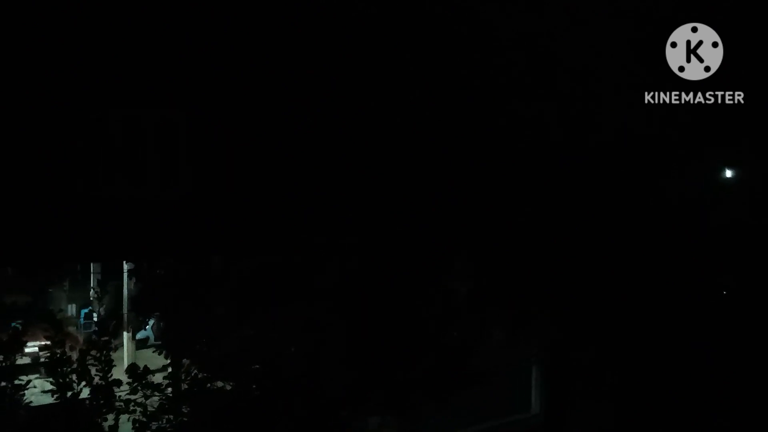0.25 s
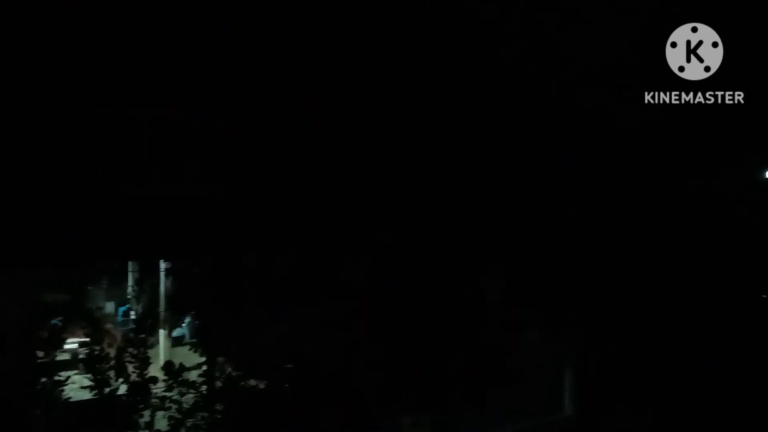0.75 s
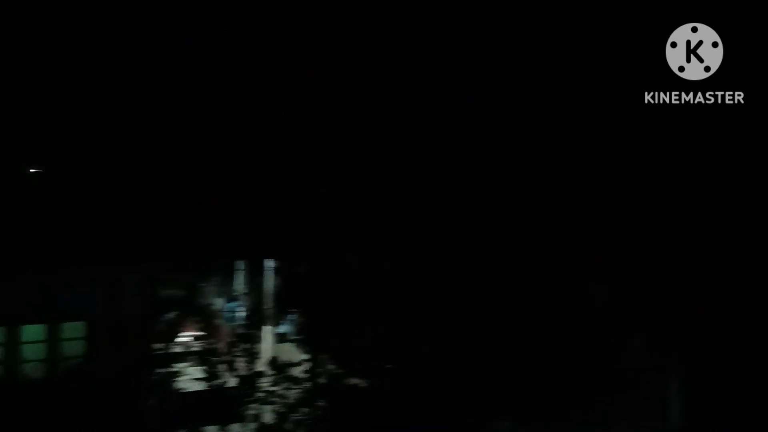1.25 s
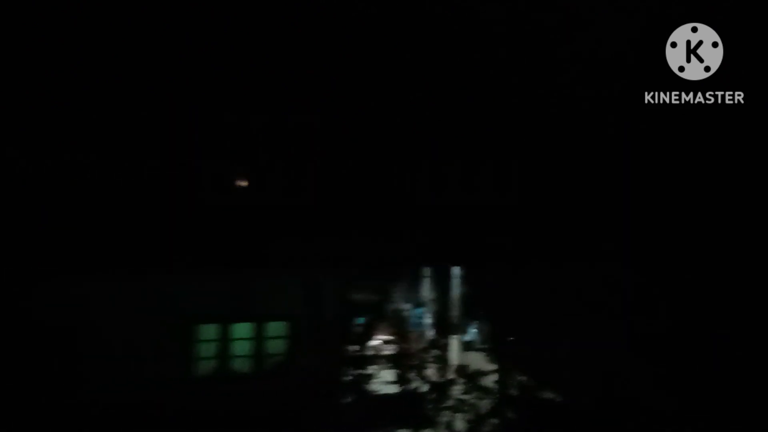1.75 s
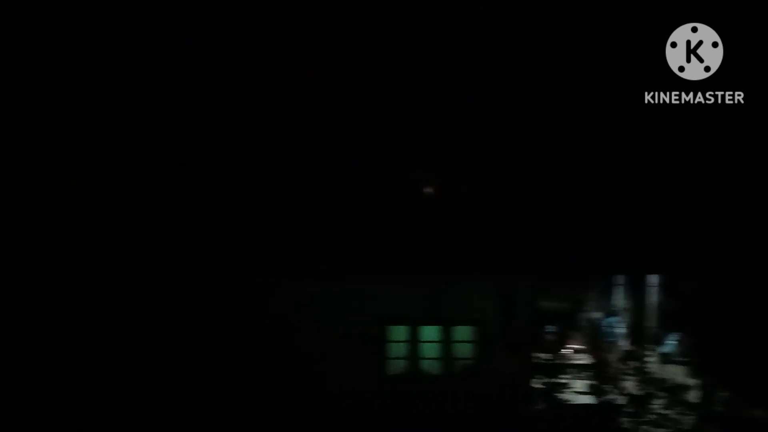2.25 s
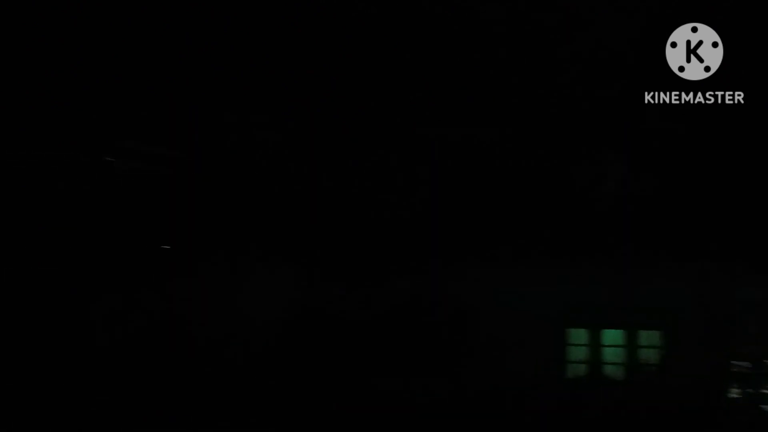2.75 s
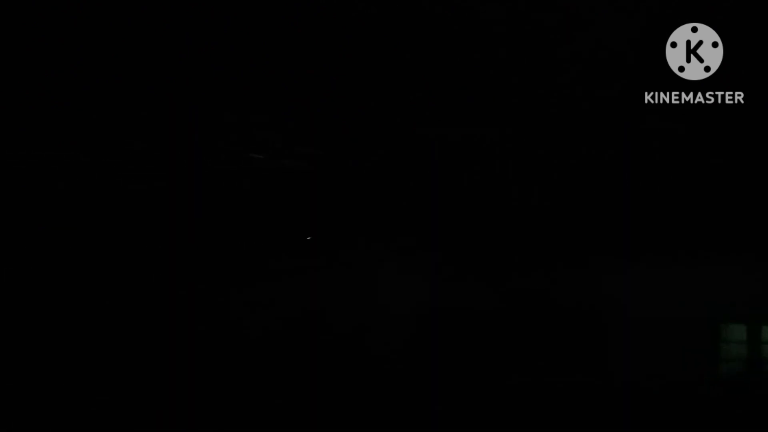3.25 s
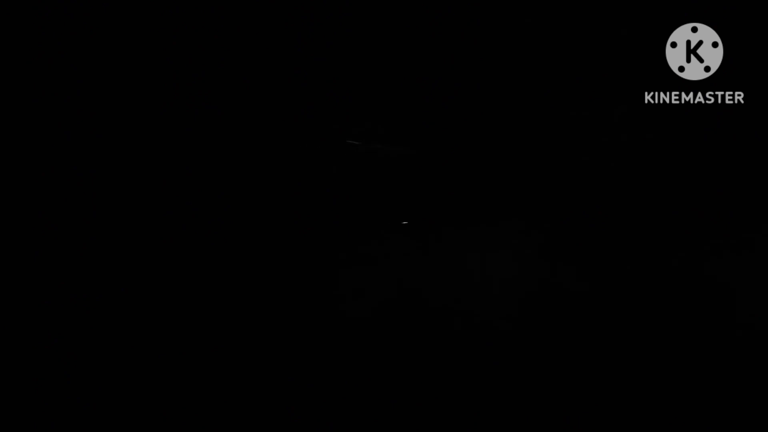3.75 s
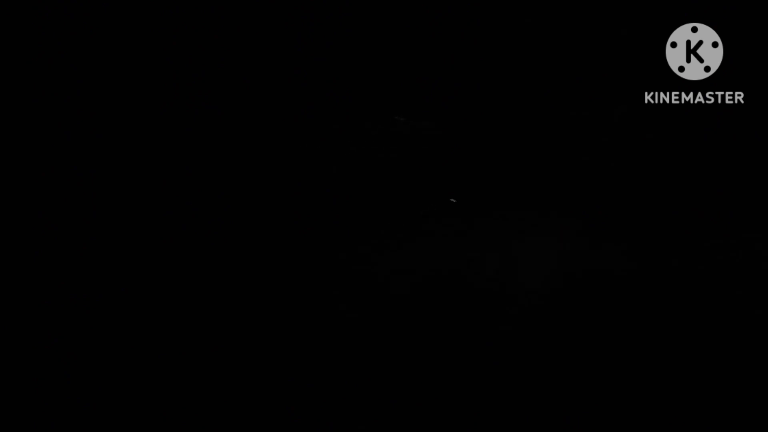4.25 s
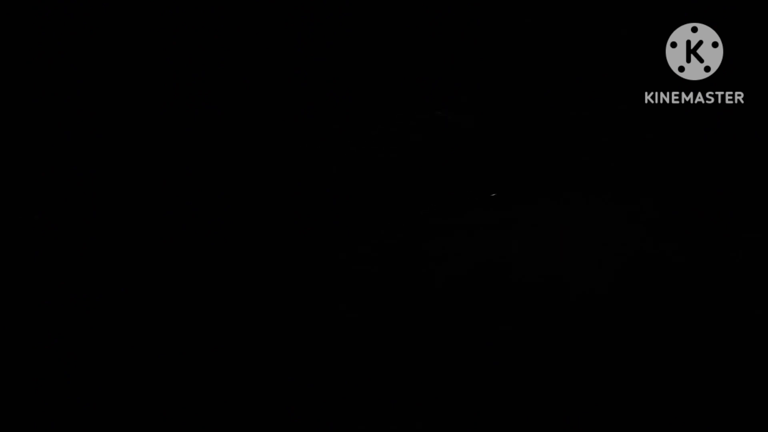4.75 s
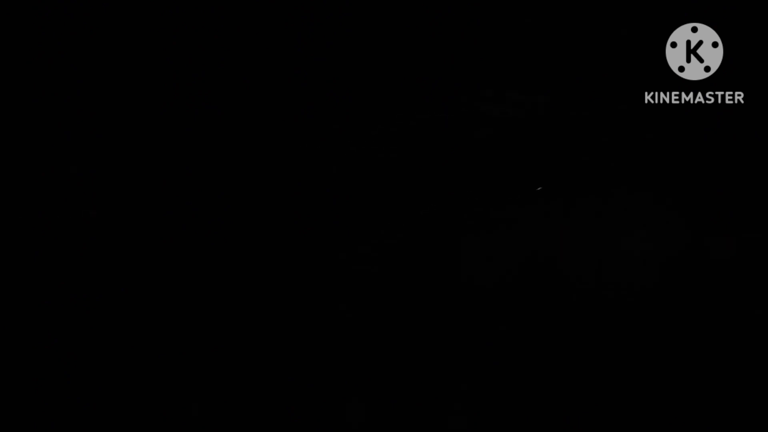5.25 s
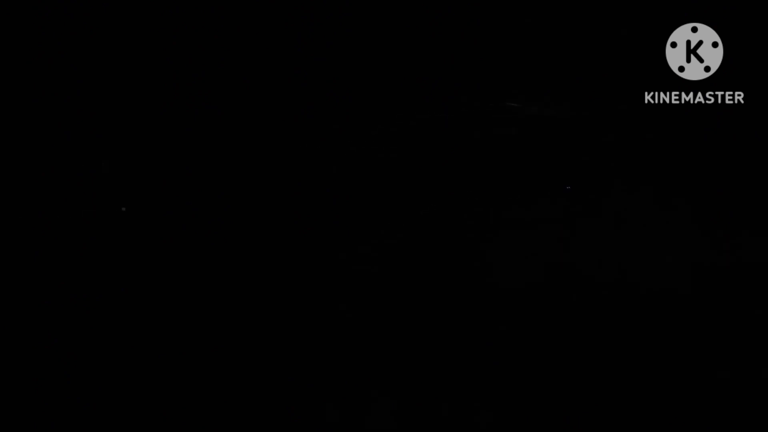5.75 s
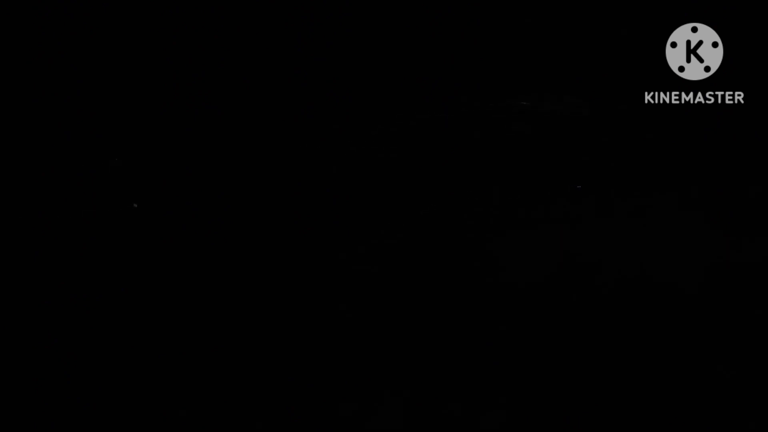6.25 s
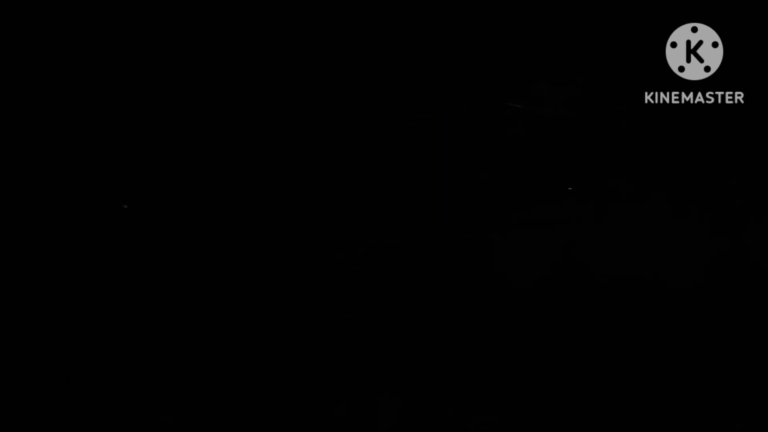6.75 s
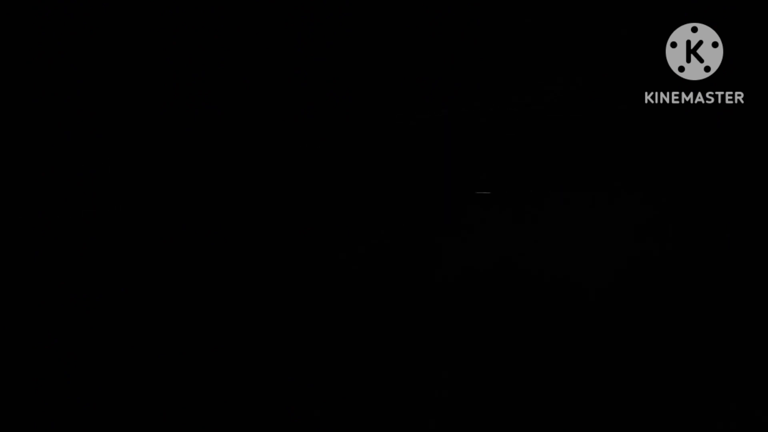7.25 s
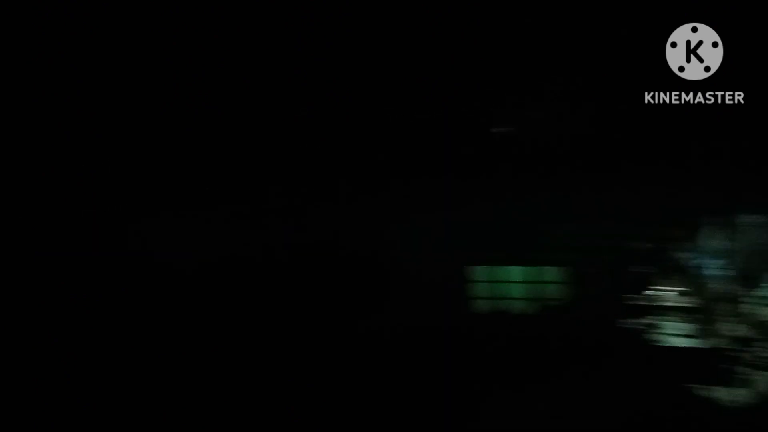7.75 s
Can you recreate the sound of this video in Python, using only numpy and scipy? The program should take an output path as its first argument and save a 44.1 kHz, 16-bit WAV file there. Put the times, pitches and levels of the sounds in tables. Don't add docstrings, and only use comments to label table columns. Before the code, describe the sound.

A nearby cricket gives short chirps over a faint far insect chorus at night, while loud finger taps knock the recorder's case.

```python
import sys
import numpy as np
from scipy import signal
from scipy.fft import rfft, irfft
from scipy.io import wavfile

SR = 44100
rng = np.random.default_rng(int(sys.argv[2]) if len(sys.argv) > 2 else 0)


def volts_from_decibels(level):
    exponent = np.asarray(level, float) / 20
    return 10 ** exponent


def int16_out(signal):
    q = np.round(np.clip(np.atleast_2d(signal).T, -1, 1) * 32767)
    wavfile.write(sys.argv[1], SR, q.astype(np.int16))


N = 352751

# t/s, peak level/dB, left-right
# level/dB, perhaps fade along the stroke [dB]
NEAR_STROKES = [(2.3216, -44.5, -8.0, -7.0), (2.3975, -43.5, -6.5, -7.0), (2.6963, -53.5, -0.5, -1.5),
                (2.7711, -44, -0.5, -6.0), (3.6548, -47, -6.5, -2.5), (3.7289, -48, -8),
                (4.2635, -48.5, -12), (5.325, -44.5, -9), (5.3994, -45, -10), (5.7753, -48, -9.5),
                (5.8486, -45, -11), (5.9272, -44, -10.5), (6.8483, -46.5, -9.5), (6.919, -45.5, -10.5),
                (6.9921, -43, -7.5)]
# centre after onset [ms], half length [ms], signed strength
STROKE_LOBES = [
    (3, 7.5, 1),
    (12.5, 4, -.55),
    (21.5, 8, -1),
]
STROKE_FROM_MS, STROKE_TO_MS = -7, 30
START_HZ, SAG_HZ_PER_MS, EASE_HZ_PER_MS2 = 3260, 20.5, .22

# first stroke t/s, last stroke t/s, peak level/dB, left-right level/dB
FAR_CHIRPS = [(.009, .080, -59, 2), (.331, .410, -61, 3), (.889, .889, -58, -2), (1.289, 1.439, -57, -2),
              (1.743, 1.888, -54, 0), (2.079, 2.140, -55, -2), (2.455, 2.579, -56, -2),
              (2.944, 3.087, -54, -2), (3.405, 3.543, -53.5, -2), (3.850, 4.129, -56, -1),
              (4.909, 5.112, -55, -3), (5.261, 5.261, -54, -7), (5.459, 5.459, -51, 0),
              (5.719, 5.719, -56, -8), (6.164, 6.164, -55.5, -4), (6.285, 6.490, -55, -2),
              (6.645, 6.789, -57, -2), (7.290, 7.362, -54, -3), (7.849, 7.922, -55.5, -5)]
STROKE_GAP_S = .07
SWELL_DB = 0.56
# t/s, level/dB
CROWD_LEVEL = [(0, -66.5), (1.23, -65), (1.74, -70), (2.38, -64.5), (3.43, -68.5), (3.61, -61.5),
               (3.92, -67), (4.28, -59.5), (4.72, -68.5), (5.26, -63), (7.35, -62.5), (8, -67)]
# t/s, level/dB
TRILLER_LEVEL = [(0, -69), (1.2, -68), (2.2, -71), (3.5, -67), (4.3, -68), (4.8, -70.5), (5.9, -70.5),
                 (7.35, -66.5), (8, -69.5)]
# f/Hz, width [Hz], level/dB
HIGH_INSECTS = [
    (8530, 700, -88),
    (11300, 920, -91.5),
    (13400, 750, -95),
]
BUSH_DB = -75
# from t/s, throbs a second [Hz]
HIGH_TEMPO = [(0, 7.71), (4.5, 8.1)]
# from t/s, throbs a second [Hz]
LOW_TEMPO = [(0, 8.47), (4, 8.8), (5.5, 8.14)]
HIGH_START, LOW_START = .45, .42

# t/s, click level/dB, left-right level/dB, knock level/dB (fleshy above 0), tick level/dB
TAPS = [(0.7524, -38.5, -1, 2, -24), (0.7824, -11.5, -5, -0.8, -20), (0.9641, -41, -2, 15, -20.0),
        (4.1319, -27.5, 2, 1, -28), (4.16, -4.5, -3, -2.5, -19.5), (4.1922, -8.5, -6.5, 8, -27),
        (4.266, -38, 0, 0, -21), (4.274, -39, -4, 4, -21.0), (4.2916, -28.5, -10, 3, -25.0),
        (4.3626, -9.5, -7.5, -12, -20.5), (4.3677, -24.5, -4, 5, -35), (4.3829, -28, -24, 5.5, -26),
        (4.6012, -14, -1, -3.5, -30), (4.6924, -50.5, -8, 11, -14.0), (4.7246, -46, 4, 6, -16.0),
        (7.5792, -26.5, -3, -4.5, -22), (7.663, -12, -6.5, -11, -12), (7.7015, -27, -5, -8.5, -38),
        (7.806, -39.5, -3, 0, -21.0)]
# f/Hz, width [Hz], level/dB
CASE_RINGS = [
    [(295, 340, 0.5), (640, 640, 10), (1080, 1600, -21)],
    [(1260, 1480, 6.5), (2025, 1050, 11.5), (3390, 1800, -13)],
    [(5200, 3400, 8.5), (7400, 2500, -15), (12000, 8100, -10)],
    [(138, 170, 0)],
]
TRAVEL_MS = 1.55, 0.39
THUMP_DB, THUMP_PER_KNOCK = -21, 0.87
# t/s, level/dB, time to fall 20 dB [s]
ROCKS = [(.969, -47, .015), (1.105, -61, .015), (1.554, -57, .025), (4.146, -30, .016), (4.168, -33, .013),
         (4.2, -34.5, .012), (4.298, -50, .018), (4.366, -46, .01), (4.418, -48, .014), (4.548, -55, .025),
         (4.608, -33, .017), (4.627, -46, .018), (4.7, -55, .015), (4.729, -49, .014), (4.996, -60, .04),
         (7.669, -49, .013), (7.706, -55, .012)]
RISE_SHARE = .45
LUMP_HZ, LUMP_SPREAD, LUMP_PAN_DB = 112, .1, 4.5
# start t/s, end t/s, start level/dB, end level/dB, left-right level/dB
RUBS = [(.964, 1.0, -50, -45.5, -12), (1.008, 1.07, -45, -47, -10), (1.078, 1.092, -49, -54, -9),
        (4.134, 4.139, -46, -53, -6), (4.203, 4.217, -41, -54.5, -8), (4.26, 4.321, -60, -61, -3),
        (4.372, 4.461, -46, -63, -4), (4.53, 4.597, -66, -53.5, -7), (4.606, 4.66, -46, -54, -6.5),
        (4.937, 5.05, -61, -67.5, 4), (7.805, 7.86, -57.5, -78, -5)]
# f/Hz, level/dB per Hz
RUB_SPECTRUM = [(120, -41), (200, -15), (312, -5), (815, -2), (1060, -6), (1320, 2), (2300, 3), (2900, -2),
                (4330, -23), (6750, -25.5), (14000, -45)]
EDGE_S = .008
# start t/s, end t/s, f/Hz, level/dB
CREAKS = [
    (4.381, 4.391, 563, -32.5),
    (4.602, 4.624, 102, -44),
    (4.626, 4.636, 486, -45),
    (4.629, 4.643, 640, -44),
    (4.721, 4.729, 640, -48.5),
]

# start t/s, end t/s, f/Hz, level/dB
HOOTS = [(0.102, 0.255, 650, -73), (0.36, 0.563, 649, -71), (.49, 0.674, 827, -68), (.44, .6, 1300, -74.5),
         (1.1, 1.26, 832, -72.5), (1.553, 1.697, 657, -68), (2.575, 2.8, 1980, -71),
         (3.78, 3.982, 1940, -74), (4.743, 5.1, 655, -68), (4.9, 5.02, 790, -68), (5.2, 5.496, 1166, -72.5)]
# f/Hz, level/dB per Hz
NIGHT_SPECTRUM = [(24, -19), (50, -22.5), (75, -13.5), (160, -14.5), (320, -16.5), (680, -9), (1100, -13.5),
                  (1650, -21.5), (2500, -16), (3500, -32), (4200, -30), (5500, -51.5), (8000, -38.5),
                  (15500, -43)]
# f/Hz, correlation [-1 to 1]
LIKENESS = [(60, 0.79), (180, 0.55), (550, 0.67), (1650, 0.047), (4970, -0.092), (15000, 0.17)]
# f/Hz, left-right level/dB
NIGHT_SIDES = [(60, 3), (240, -1), (950, 0.5), (3770, -0.5), (15000, 2)]
NIGHT_DB = -60.5
HUM_HZ, HUM_DB = 100.5, -66.5

TOP_HZ = 15500
OFFSET = .00105


def rms_one(x):
    return x / np.sqrt(np.mean(x ** 2) + 1e-20)


def in_time(rows):
    s, *columns = np.transpose(rows)
    return [np.interp(np.arange(N) / SR, s, column) for column in columns]


def at_hz(points, hz):
    points = np.array(points)
    return np.interp(np.log(hz), np.log(points[:, 0]), points[:, 1])


def sides(pan_db):
    return volts_from_decibels(np.array([pan_db / 2, -pan_db / 2]))


def drift(rate):
    r = np.exp(-80 * np.pi * rate / SR)
    slow = signal.lfilter([1], [1, -2 * r, r * r], rng.standard_normal(N // 40 + 2002))[2000:]
    return np.interp(np.arange(N) / 40, np.arange(len(slow)), rms_one(slow))


def resonance(x, hz, width_hz):
    r = np.exp(-np.pi * width_hz / SR)
    poles = [1, -2 * r * np.cos(2 * np.pi * hz / SR), r * r]
    return signal.lfilter(np.array([1, 0, -1]) * (1 - r * r) / 2, poles, x)


def narrow(hz, width_hz):
    once = resonance(rng.standard_normal((2, N)), hz, width_hz)
    return rms_one(resonance(once, hz, width_hz))


def add(out, s, sound):
    i = max(round(s * SR), 0)
    out[:, i:i + sound.shape[1]] += sound[:, :N - i]


def stroke(stretch, tune, phases, fade_db):
    t = np.arange(STROKE_FROM_MS, STROKE_TO_MS, 1000 / SR / stretch)
    shape = 0
    for ms, half, strength in STROKE_LOBES:
        shape = shape + strength * np.cos(np.pi / 2 * np.clip((t - ms) / half, -1, 1)) ** 1.5
    age = t - STROKE_FROM_MS
    hz = START_HZ - SAG_HZ_PER_MS * age + EASE_HZ_PER_MS2 * age ** 2
    turns = np.cumsum(tune * hz) / SR
    return shape * volts_from_decibels(fade_db * t / 20) * np.sin(2 * np.pi * turns + np.array(phases)[:, None])


def crickets(rows, trim_db, tune_spread, echo_db, scatter=3):
    out = np.zeros((2, N))
    for (s, db, pan_db, *fade_db), (a, b, c, d) in zip(rows, rng.standard_normal((len(rows), 4))):
        phases = (3 * c, 3 * c + 1.6 + scatter * d)
        both = stroke(1 + .03 * a, 1 + tune_spread * b, phases, sum(fade_db))
        add(out, s + STROKE_FROM_MS / 1000, volts_from_decibels(db + trim_db) * sides(pan_db)[:, None] * both)
    age = np.arange(6000) / SR
    sparse = rng.random((2, len(age))) < .01
    echoes = rng.standard_normal((2, len(age))) * sparse * volts_from_decibels(-60 * age / 0.67) * (age > .004)
    echoes /= np.sqrt(np.sum(echoes ** 2, axis=1, keepdims=True))
    return out + volts_from_decibels(echo_db) * signal.fftconvolve(out, echoes, axes=1)[:, :N]


def near_crickets():
    return crickets(NEAR_STROKES, 0.57, tune_spread=0.0063, echo_db=-13, scatter=0.099)


def taps():
    out, hz = np.zeros((2, N)), np.fft.rfftfreq(4096, 1 / SR) + 1
    impulse = np.zeros(4096)
    impulse[0] = 1
    rings = []
    for i, part in enumerate(CASE_RINGS):
        ring = 0
        for k, (f, width, db) in enumerate(part):
            mode = resonance(resonance(impulse, f, 0.91 * width), f, 1.51 * width)
            ring = ring + (-1) ** (i + k) * volts_from_decibels(db) * mode
        rings.append(ring)
    for (s, db, pan_db, knock_db, tick_db), chance in zip(TAPS, rng.random((len(TAPS), 2, 2))):
        tilt_db = np.clip(1 - knock_db, 0, 7)
        thump_db = THUMP_DB + THUMP_PER_KNOCK * knock_db
        levels = [(knock_db, pan_db + tilt_db), (0, pan_db - 2), (tick_db, pan_db - 2), (thump_db, pan_db + 7)]
        both = np.zeros((2, 3000))
        for port, (ms, (a, b)) in enumerate(zip(TRAVEL_MS, chance)):
            turns = ms * (.8 + .4 * a) * (2 * np.sqrt(hz / 1000) - hz / 4000)
            back = 1 - 0.27 * np.exp(-2j * np.pi * (hz * (0.000935 + 0.00069 * b) + 0.494 * turns))
            for ring, (level_db, side_db) in zip(rings, levels):
                wave = irfft(rfft(ring) * np.exp(-2j * np.pi * turns) * back)[:3000]
                share = sides(side_db) / np.linalg.norm(sides(side_db))
                both[port] += volts_from_decibels(db + level_db) * share[port] * wave / abs(signal.hilbert(wave)).max()
        add(out, s - .0004, both)
    return out


def rocking():
    out, t = np.zeros((2, N)), np.arange(-.05, .2, 1 / SR)
    for (s, db, fall_s), (a, b, c) in zip(ROCKS, rng.standard_normal((len(ROCKS), 3))):
        swell = volts_from_decibels(db + 3 - 20 * np.maximum(t, -t / RISE_SHARE) / fall_s)
        turns = LUMP_HZ * (1 + LUMP_SPREAD * a) * t * (1 - 2 * t)
        lump = np.sin(2 * np.pi * turns + 3 * b + np.array([[0], [.8 * c]]))
        add(out, s + t[0], swell * lump * sides(LUMP_PAN_DB)[:, None])
    return out


def rubs():
    hz = np.fft.rfftfreq(N + 49, 1 / SR) + 1
    jerks = rng.standard_normal((2, N + 49)) * volts_from_decibels(2.0 * rng.exponential(1, (2, N + 49)))
    rub = rms_one(irfft(rfft(jerks) * volts_from_decibels(at_hz(RUB_SPECTRUM, hz)))[:, :N])
    touch = np.zeros((2, N))
    for start, end, start_db, end_db, pan_db in RUBS:
        s = [start - EDGE_S / 2, start, end, end + 2 * EDGE_S]
        corners_db = [start_db - 25, start_db, end_db, end_db - 20]
        level_db = np.interp(np.arange(s[0], s[-1], 1 / SR), s, corners_db)
        add(touch, s[0], volts_from_decibels(level_db + 4) * sides(pan_db)[:, None])
    return touch * rub


def tones(rows, pan_db):
    out = np.zeros((2, N))
    for start, end, hz, db in rows:
        swell = np.hanning(round((end - start) * SR)) ** .6
        wobble = drift(30)[:len(swell)]
        tone = np.sin(2 * np.pi * np.cumsum(hz + 4 * wobble) / SR)
        add(out, start, volts_from_decibels(db + 3 + 3.8 * wobble) * swell * tone * sides(pan_db)[:, None])
    return out


def far_crickets():
    rows = []
    for first, last, db, pan_db in FAR_CHIRPS:
        count = 1 + round((last - first) / STROKE_GAP_S)
        for k, s in enumerate(np.linspace(first, last, count)):
            rows.append((s, db + SWELL_DB * k, pan_db))
    return crickets(rows, -2.5, tune_spread=.01, echo_db=-3.5, scatter=.3)


def throb(tempo, start):
    s, rate = np.transpose(tempo)
    current = rate[np.searchsorted(s, np.arange(N) / SR, "right") - 1]
    return np.cos(2 * np.pi * (start + np.cumsum(current) / SR))


def bush_crickets():
    upper_db = (3 + .7 * drift(1)) * throb(HIGH_TEMPO, HIGH_START)
    lower_db = -6 + (4.5 + drift(1)) * throb(LOW_TEMPO, LOW_START)
    upper = volts_from_decibels(upper_db) * narrow(6950, 560)
    lower = volts_from_decibels(lower_db) * (narrow(6050, 450) + narrow(6450, 450)) * sides(-4.5)[:, None]
    return rms_one(upper + lower)


def chorus():
    (crowd_db,), (trill_db,) = in_time(CROWD_LEVEL), in_time(TRILLER_LEVEL)
    rows = rng.random((260, 3)) * [N / SR, 10, 12] - [0, 0, 6]
    crowd = rms_one(crickets(rows, 0, tune_spread=0.0351, echo_db=11))
    crowd = crowd + volts_from_decibels(-8.0 + 2 * drift(1)) * narrow(3353, 200)
    trill = narrow(2074, 170) * volts_from_decibels(1.0 * drift(3.8))
    singers = volts_from_decibels(crowd_db - 2.7) * crowd + volts_from_decibels(trill_db + 1) * trill + volts_from_decibels(BUSH_DB) * bush_crickets()
    high = sum(volts_from_decibels(db) * narrow(hz, width_hz) for hz, width_hz, db in HIGH_INSECTS)
    return singers * sides(-3)[:, None] + high


def night(patchy_db):
    out, together, edges = 0, drift(1.2), 20 * 2 ** np.arange(0, 10, .5)
    white = rng.standard_normal((2, 2, N))
    for k, (low, high) in enumerate(zip(edges, edges[1:])):
        band = signal.butter(2, [low, high], "band", fs=SR, output="sos")
        mid, side = signal.sosfilt(band, white[k % 2])
        hz = np.sqrt(low * high)
        alike = np.clip(at_hz(LIKENESS, hz), -1, 1)
        level_db = at_hz(NIGHT_SPECTRUM, hz) + patchy_db * (.6 * together + drift(6))
        gain = volts_from_decibels(level_db) * sides(at_hz(NIGHT_SIDES, hz))[:, None]
        out = out + gain * (np.sqrt(1 + alike) * mid + np.sqrt(1 - alike) * side * [[1], [-1]])
    top = signal.sosfilt(signal.butter(2, edges[-1], "high", fs=SR, output="sos"), white[1])
    out = out + volts_from_decibels(NIGHT_SPECTRUM[-1][1]) * np.sqrt(2) * top
    hum = np.sin(2 * np.pi * np.cumsum(HUM_HZ + 1.065 * drift(2.21)) / SR)
    return volts_from_decibels(NIGHT_DB) * rms_one(out) + hum * volts_from_decibels(HUM_DB + 1.5 + 0.47 * drift(4.4))


def scene():
    hands = taps() + rocking() + rubs() + tones(CREAKS, -4.5)
    insects = near_crickets() + far_crickets() + chorus()
    return insects + hands + tones(HOOTS, 0) + night(patchy_db=.8)


def roll_off(x):
    return signal.sosfilt(signal.butter(12, 16360, fs=SR, output="sos"), x)


def record(dry):
    cut = signal.sosfilt(signal.cheby2(10, 35, TOP_HZ + 350, fs=SR, output="sos"), dry)
    return roll_off(cut + OFFSET)


dry = scene()
out = record(dry)
int16_out(out)
```